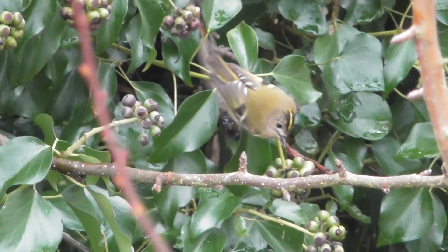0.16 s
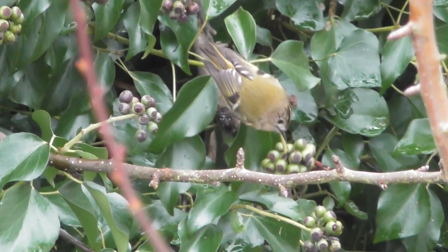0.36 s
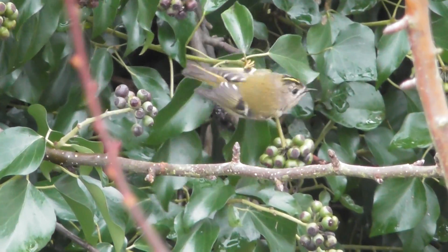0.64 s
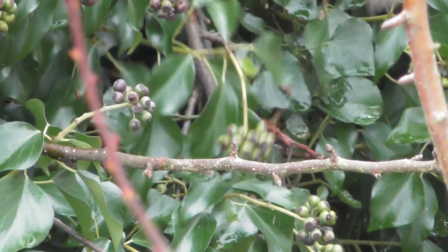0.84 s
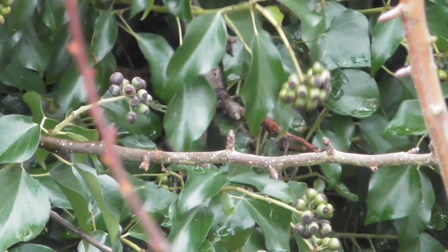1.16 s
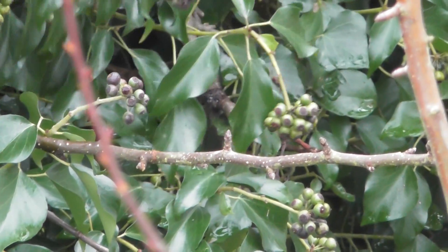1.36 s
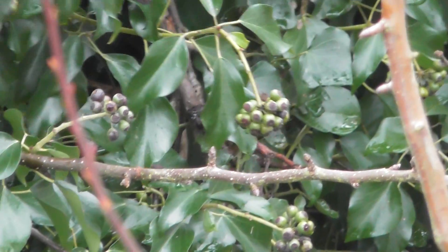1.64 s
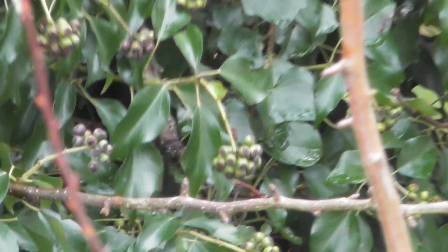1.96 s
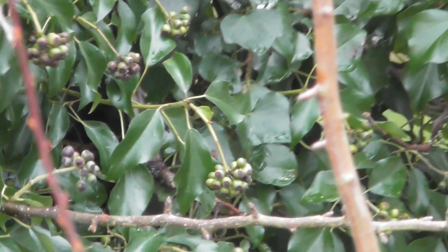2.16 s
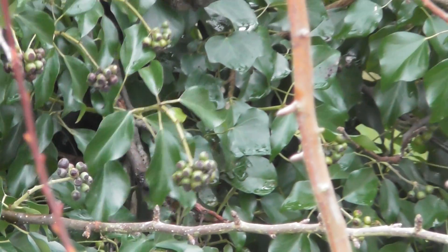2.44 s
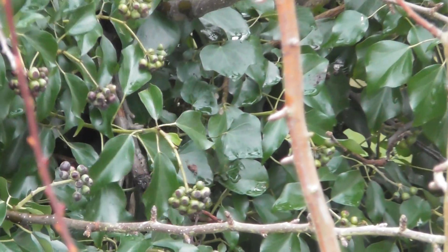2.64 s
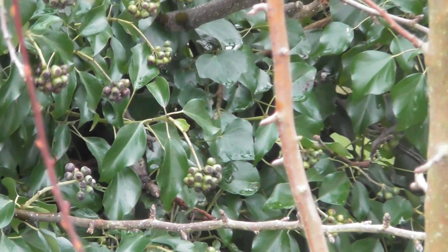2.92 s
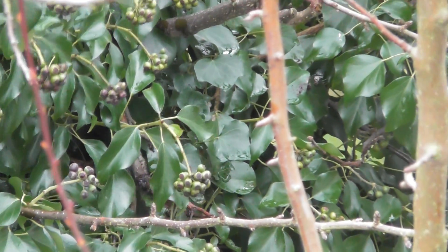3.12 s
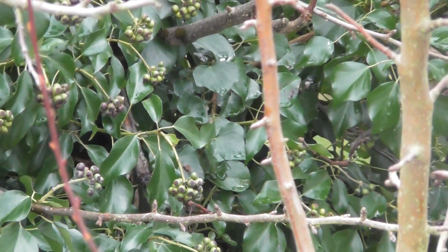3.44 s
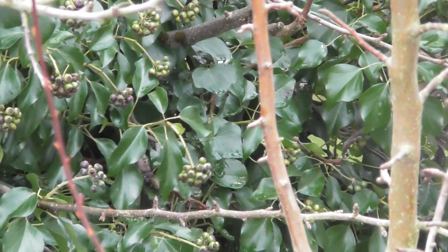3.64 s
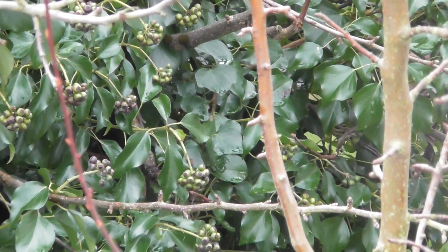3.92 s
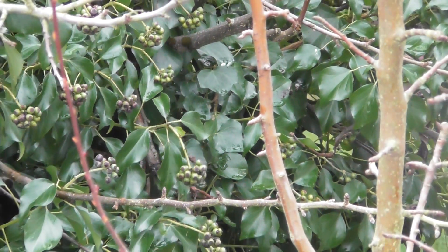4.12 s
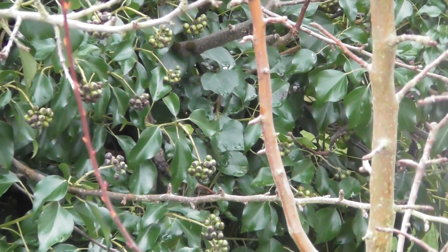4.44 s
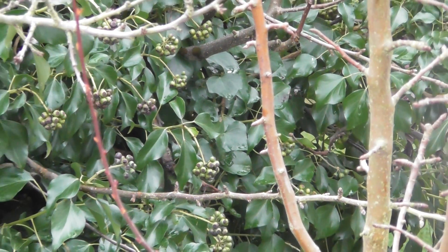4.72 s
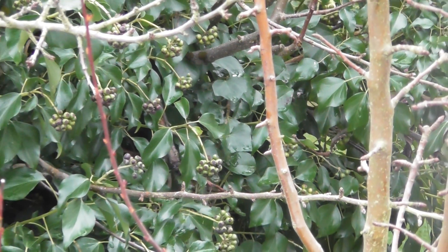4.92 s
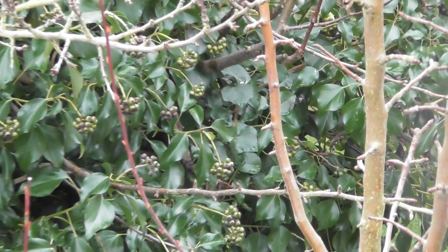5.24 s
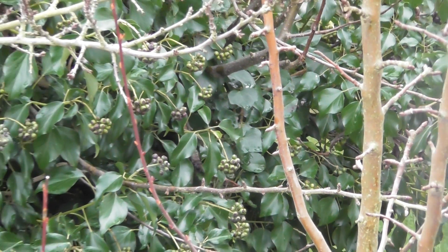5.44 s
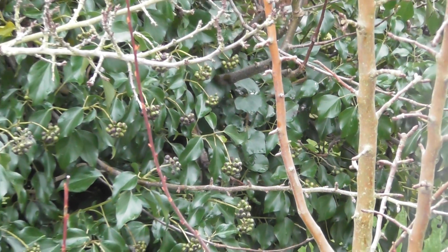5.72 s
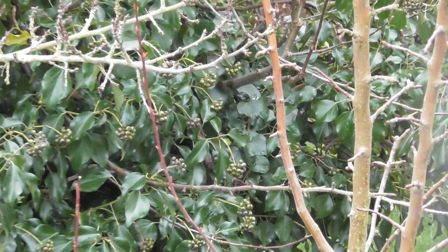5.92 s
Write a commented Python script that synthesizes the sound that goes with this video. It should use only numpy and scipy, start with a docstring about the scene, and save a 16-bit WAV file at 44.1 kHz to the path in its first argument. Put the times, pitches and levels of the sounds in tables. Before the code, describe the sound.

Very high, pure bird calls and one quick wing flick against leaves, with tiny ticks afterwards, above a steady soft traffic rumble in a garden.

```python
"""Thin, falling whistles and short sharp calls: a goldcrest in ivy, each note one pure, trembling tone.
It flicks off its twig with two wing strokes, bursts of noise over a short ring, and ticks and rustles follow.
It keeps calling from deeper in the hedge, whose leaves scatter the sound as dense, fading echoes.
Other birds glide faintly far off. Distant traffic, garden air and breeze on the microphone ports are coloured
noise; the camera hisses, and its lens motor whirs faintly now and then as resonant noise."""
import sys
import numpy as np
from scipy import signal
from scipy.fft import rfft, irfft, next_fast_len
from scipy.io import wavfile
from scipy.ndimage import map_coordinates

SR = 44100
rng = np.random.default_rng(int(sys.argv[2]) if len(sys.argv) > 2 else 0)


def output_pcm(signal):
    """Save a mono or channel-first signal as 16-bit PCM at the path in sys.argv[1].

    Samples are clipped to [-1, 1] before scaling.
    """
    pcm = np.clip(np.atleast_2d(signal).T, -1, 1) * 32767
    wavfile.write(sys.argv[1], SR, np.round(pcm).astype(np.int16))


N = 267775

# In every table a positive left-right level in dB is louder on the left.
# Long falling whistles. Each row: start in seconds, length in seconds, slide in seconds, final pitch in Hz,
# level in dB, soft opening in dB, left-right level in dB, share scattered by the leaves in dB.
WHISTLES = [(0.572, 0.28, .265, 7407, -43, -13, -2, -12), (1.35, .18, .15, 8370, -77, -1, 3, -8),
            (3.362, 0.23, .18, 8090, -65.5, -1.5, 2, -0.5), (5.83, 0.16, .125, 8330, -65, -5, 7, -15)]
# Every whistle starts on the same pitch, slides down ever more slowly and levels off.
WHISTLE_TOP_HZ, SLIDE_BEND = 8894, 1.5
OPENING_S, SWELL_S, WHISTLE_ATTACK_S, WHISTLE_RELEASE_S = 0.058, 0.014, 0.0053, 0.082
# Short arched calls. Each row: start in seconds, length in seconds, top pitch in Hz (before scoop and sag),
# final drop in Hz, lateness of the drop (an exponent), level in dB, attack in seconds, release in seconds,
# left-right level in dB, share scattered by the leaves in dB.
CONTACT_CALLS = [(3.839, 0.14, 8130, 520, 6, -54.5, 0.057, .06, -4.5, -10),
                 (4.488, 0.049, 7856, 420, 1.4, -51.5, 0.0018, 0.0033, 2, -4),
                 (5.8175, .045, 7745, 120, 2.2, -56.5, .002, .004, 0, -3.5)]
SCOOP_HZ, SCOOP_S = 480, 0.005  # each call flicks up towards its top pitch
SAG_HZ_PER_S = 1800  # and sags steadily
# Soft level notes, a little higher at both ends. Each row: start in seconds, length in seconds, pitch in Hz,
# lift at the ends in Hz, level in dB, left-right level in dB.
SOFT_NOTES = [(3.402, .09, 6650, 150, -70.5, 1), (5.347, 0.1, 6610, 280, -72.5, 0),
              (5.975, .07, 8340, 18, -68, 7)]
SOFT_EDGE_S = 0.011
# Tiny rising chips. Each row: start in seconds, starting pitch in Hz, rise in Hz, level in dB.
CHIPS = [(3.672, 6550, 497, -72.5), (3.757, 6400, 1400, -71), (3.854, 6200, 850, -75)]
CHIP_S, CHIP_BEND = 0.028, 0.6
# The two microphone ports hear the highest tones out of step. Each row: Hz, lead of the left in radians.
PORT_LEAD = [(7500, 0.14), (8050, 0.35), (8300, 1.4), (8550, 2.4)]

# Wing strokes against the leaves. Each row: start in seconds, slap in dB, knock in dB, slap's t60 in seconds.
WING_STROKES = [(0.7161, -39.5, -39, 0.03), (0.731, -48, -36, 0.048)]
# Spectrum of the slap. Each row: Hz, dB.
SLAP_SPECTRUM = [(1500, -12), (2600, -25), (3300, -7), (4150, -4), (4900, -8), (6000, -2.5), (9500, 1),
                 (11500, -11), (15500, -13)]
# Ringing tones of the struck twig and leaf. Each row: Hz, dB, t60 in seconds.
TWIG_MODES = [(500, -8, 0.045), (645, 5.5, 0.042), (1187, -8, 0.045), (4180, -6.5, 0.016)]
# The twig springs back, the bird lands, the leaves settle.
# Each row: start in seconds, level in dB, rise in seconds, t60 in seconds.
RUSTLES = [(.728, -54.5, .008, 0.25), (.861, -53.5, 0.0089, 0.18), (.93, -63, .02, .25)]
# Feet and feathers tick on the ivy. Each row: start in seconds, level in dB, t60 in seconds.
TICKS = [(0.8394, -49.5, 0.018), (0.852, -56, 0.013), (0.8695, -58, 0.011), (.884, -60, 0.02),
         (1.656, -58.5, 0.03), (1.847, -62, .02), (3.108, -61, 0.025), (3.838, -60, 0.019),
         (4.4224, -62, .025), (4.8418, -59, 0.014), (5.171, -54.5, 0.012)]
# Spectrum of the ticks and rustles. Each row: Hz, dB.
IVY_SPECTRUM = [(1500, -7), (3200, -2.5), (5000, -3.5), (6300, 6), (8500, 10.5), (11000, -3), (15500, -18)]
# Agreement of the two channels for close sounds. Each row: Hz, left-right likeness from 0 to 1.
NEAR_ALIKE = [(600, 0.75), (6800, 1), (8500, 0.44), (15000, .2)]

# Other birds, far off. Each row: start in seconds, length in seconds, pitch in Hz, glide in Hz, level in dB.
FAR_NOTES = [(1.507, .13, 8340, -50, -79), (1.54, .11, 7400, -280, -79), (3.928, .21, 2730, 139, -87)]

# Lens motor runs. Each row: start in seconds, end in seconds, level in dB.
LENS_RUNS = [(0.427, 0.662, -70.5), (1.885, 2.175, -71), (3.3, 3.405, -71), (5.567, 5.68, -70.5)]
# Resonances of the lens barrel, before the response is squared. Each row: Hz, width in Hz, gain in dB.
LENS_MODES = [(6730, 400, -3), (7420, 300, 1.5), (8080, 280, 3), (9520, 550, 1.5)]

# Spectrum of the traffic's low rumble. Each row: Hz, dB.
RUMBLE_SPECTRUM = [(15, -26.5), (25, -16.5), (38, -14.5), (48, -2), (75, -4), (100, 0.5), (170, 1),
                   (300, 0), (328, 1), (350, -7), (400, -20), (600, -50.5)]
# Spectrum of the tyre wash. Each row: Hz, dB.
WASH_SPECTRUM = [(150, -14), (300, -7), (380, 1.5), (560, 1), (750, -2), (950, -3), (1200, -13),
                 (1330, -23.5), (1420, -47), (1600, -71)]
# Spectrum of the garden air. Each row: Hz, dB.
AIR_SPECTRUM = [(1000, -48), (1430, -11), (1530, 1), (1850, -2), (2200, -10.5), (2580, -15.5), (2900, -7),
                (3500, -9.5), (4300, -9), (5100, -17), (6100, -6), (7500, -1.5), (10000, -12),
                (15000, -21.5)]
# Agreement of the two channels for distant sounds. Each row: Hz, left-right likeness from 0 to 1.
FAR_ALIKE = [(25, .4), (60, 1), (125, 0.97), (500, 0.94), (1000, .98), (4000, 1)]
# Lean of the distant sounds to one side. Each row: Hz, left-right level in dB.
FAR_LEAN = [(25, -12.5), (60, 0), (125, -0.7), (250, 0.5), (500, 3), (1000, 0.65), (2000, 1), (8000, -1)]
# Levels ahead of sway, receding and lean.
RUMBLE_DB, WASH_DB, AIR_DB = -45.5, -52, -73
RECEDE_FROM_S, RECEDE_DB_PER_S = 3.94, 0.66  # traffic and air draw slowly away
# Puffs of breeze. Each row: centre in seconds, peak in dB ahead of the flutter, half-length in seconds.
GUSTS = [(2.33, -62, .05), (2.672, -46, .03), (2.88, -64, 0.13)]
BREEZE_DB = -71  # the calm between puffs, ahead of the flutter
# Spectrum of the breeze on the microphone ports. Each row: Hz, dB.
BUFFET_SPECTRUM = [(8, 2), (22, 7.5), (45, 4), (90, -4), (200, -56.5)]
# Spectrum of the camera's hiss. Each row: Hz, dB.
HISS_SPECTRUM = [(3000, -61), (5300, -45), (6500, -30), (8200, 3.5), (10000, 3.5), (13000, 3.5), (15700, 3)]
# Agreement of the two channels of hiss. Each row: Hz, left-right likeness from 0 to 1.
HISS_ALIKE = [(6800, 0.88), (8200, 0.47), (15000, 0.13)]
TOP_HZ = 15750  # the camera's band limit


def amp(db):
    """Decibels to gain."""
    return 10 ** (np.asarray(db) / 20)


def unit(x):
    """x at rms 1."""
    return x / np.sqrt(np.mean(x ** 2) + 1e-20)


def clock():
    """The time of each sample in seconds."""
    return np.arange(N) / SR


def progress(start, length):
    """0 before the start, rising evenly to 1 over the length."""
    return np.clip((clock() - start) / length, 0, 1)


def along(points, hz):
    """(Hz, value) points read off on a log frequency axis."""
    f, v = np.transpose(points)
    return np.interp(np.log(hz + 1), np.log(f + 1), v)


def gate(start, end, attack, release):
    """1 between start and end, with a smooth rise and fall."""
    rise = (clock() - start) / attack
    fall = (end - clock()) / release
    return np.sin(np.pi / 2 * np.clip(np.minimum(rise, fall), 0, 1)) ** 2


def burst(start, t60, attack):
    """A quick rise and an exponential decay, as of something struck."""
    t = np.maximum(clock() - start, 0)
    return (1 - np.exp(-t / attack)) * amp(-60 * np.minimum(t / t60, 10))


def sides(db):
    """Left and right gains for a level difference."""
    return amp(np.array([[.5], [-.5]]) * db)


def filtered(x, response):
    """x times a response of frequency."""
    m = next_fast_len(N + SR // 4)
    return irfft(rfft(x, m) * response(np.fft.rfftfreq(m, 1 / SR)), m)[..., :N]


def colour(points):
    """The response of a (Hz, dB) spectrum."""
    return lambda hz: amp(along(points, hz))


def body(modes):
    """The summed response of a few resonances, each with a centre, width and gain."""
    return lambda f: sum(amp(db) * 1j * f * w / (c * c - f * f + 1j * f * w) for c, w, db in modes)


def noise(response, alike):
    """Coloured stereo noise of rms 1; alike is one likeness or (Hz, likeness) points."""
    def mid_side_response(hz):
        likeness = along(alike, hz) if np.ndim(alike) else alike + 0 * hz
        turn = np.arccos(np.clip(likeness, -1, 1)) / 2
        return response(hz) * np.array([np.cos(turn), np.sin(turn)])

    mid, side = filtered(rng.standard_normal((2, N)), mid_side_response)
    return unit(np.array([mid + side, mid - side]))


def wobble(rate):
    """A smooth random curve, rate knots a second."""
    knots = rng.standard_normal(int(N * rate / SR) + 4)
    return map_coordinates(knots, [np.arange(N) * rate / SR])


def goldcrest():
    """The bird in the ivy: long falling whistles, short contact calls, soft notes and chips."""
    return whistles() + contact_calls() + soft_notes() + chips()


def whistles():
    """Each whistle opens softly, swells, and slides down until it settles on its final pitch."""
    out = np.zeros((2, N))
    for s, length, slide, final_hz, db, opening_db, pan_db, scatter_db in WHISTLES:
        hz = final_hz + (WHISTLE_TOP_HZ - final_hz) * (1 - progress(s, slide)) ** SLIDE_BEND
        opening = (1 - np.tanh((clock() - s - OPENING_S) / SWELL_S)) / 2
        size = amp(db + opening_db * opening) * gate(s, s + length, WHISTLE_ATTACK_S, WHISTLE_RELEASE_S)
        out += sing(hz, size, pan_db, scatter_db, waver_hz=21.2, flutter_db=0.8)
    return out


def contact_calls():
    """The pitch flicks up towards its top, sags, then drops away towards the end of the call."""
    out = np.zeros((2, N))
    for s, length, top_hz, drop_hz, lateness, db, attack, release, pan_db, scatter_db in CONTACT_CALLS:
        u = progress(s, length)
        age = u * length
        scoop_hz = SCOOP_HZ * np.exp(-age / SCOOP_S)
        hz = top_hz - scoop_hz - SAG_HZ_PER_S * age - drop_hz * u ** lateness
        size = amp(db) * gate(s, s + length, attack, release)
        out += sing(hz, size, pan_db, scatter_db, waver_hz=30, flutter_db=3.0)
    return out


def soft_notes():
    """Quiet level notes whose pitch is curled up at both ends."""
    out = np.zeros((2, N))
    for s, length, hz, lift_hz, db, pan_db in SOFT_NOTES:
        curl = (2 * progress(s, length) - 1) ** 4  # 1 at both ends, 0 in the middle
        size = amp(db) * gate(s, s + length, SOFT_EDGE_S, SOFT_EDGE_S)
        out += sing(hz + lift_hz * curl, size, pan_db, scatter_db=-12, waver_hz=28.2, flutter_db=2.5)
    return out


def chips():
    """Tiny upward flicks of pitch, fastest at the start."""
    out = np.zeros((2, N))
    for s, start_hz, rise_hz, db in CHIPS:
        hz = start_hz + rise_hz * progress(s, CHIP_S) ** CHIP_BEND
        size = amp(db) * gate(s, s + CHIP_S, attack=0.0036, release=.004)
        out += sing(hz, size, pan_db=0, scatter_db=-8, waver_hz=60.5, flutter_db=0.0)
    return out


def sing(hz, size, pan_db, scatter_db, waver_hz, flutter_db):
    """The syrinx sings one pure, slightly trembling tone, and the leaves scatter it."""
    phase = 2 * np.pi * np.cumsum(hz + waver_hz * wobble(260)) / SR
    port_phase = np.array([[.5], [-.5]]) * along(PORT_LEAD, hz)
    envelope = np.sqrt(2) * size * amp(flutter_db * wobble(170))  # the root of 2 makes size an rms
    direct = envelope * np.sin(phase + port_phase)
    return sides(pan_db) * direct + amp(scatter_db) * hedge(direct[0])


def hedge(x, near_t60=0.06, far_t60=0.85, far_db=-8, apart_db=-14):
    """Nearby leaves throw back a dense flurry of echoes; the rest of the hedge adds a short, fading tail."""
    t = np.arange(SR // 8) / SR
    flurry = amp(-60 * t / near_t60)
    tail = amp(far_db - 60 * t / far_t60)
    fade_out = np.cos(np.pi / 2 * t / t[-1])
    decay = (flurry + tail) * fade_out * (t > .002)  # no echo in the first 2 ms
    mid, side = rng.standard_normal((2, len(t))) * decay
    echoes = mid + amp(apart_db) * np.array([side, -side])
    return signal.oaconvolve(x[None], echoes / np.linalg.norm(echoes[0]), axes=1)[:, :N]


def wings():
    """Each stroke slaps the leaves and knocks the twig into a short ring."""
    slap = noise(colour(SLAP_SPECTRUM), NEAR_ALIKE)
    out = np.zeros((2, N))
    for s, slap_db, knock_db, t60 in WING_STROKES:
        ring = np.zeros(N)
        for hz, db, life in TWIG_MODES:
            ring += amp(db) * np.sin(2 * np.pi * hz * (clock() - s)) * burst(s, life, attack=0.0023)
        out += amp(slap_db) * slap * burst(s, t60, attack=0.00059)
        out += amp(knock_db) * ring
    return out


def ivy():
    """The sprung twig rustles in crackly clumps; single ticks follow as the bird hops on."""
    ticks = sum(amp(db) * burst(s, t60, attack=0.00016) for s, db, t60 in TICKS)
    swells = sum(amp(db) * burst(s, t60, rise) for s, db, rise, t60 in RUSTLES)
    crackle = unit(amp(1.9 * wobble(450)))
    return (ticks + swells * crackle) * noise(colour(IVY_SPECTRUM), NEAR_ALIKE)


def far_bird():
    """Faint gliding notes from far off, blurred by their echoes."""
    out = np.zeros((2, N))
    for s, length, start_hz, glide_hz, db in FAR_NOTES:
        hz = start_hz + glide_hz * progress(s, length)
        size = amp(db) * gate(s, s + length, attack=.03, release=.03)
        out += sing(hz, size, pan_db=-5, scatter_db=-1.3, waver_hz=91, flutter_db=3.5)
    return out


def lens():
    """Close to the microphone, the lens motor whirs in the narrow resonances of its barrel."""
    whir = noise(lambda hz: np.abs(body(LENS_MODES)(hz)) ** 2, NEAR_ALIKE)
    runs = sum(amp(db) * gate(start, end, attack=0.0073, release=0.0072) for start, end, db in LENS_RUNS)
    return whir * runs


def traffic_and_air(sway_db=.5):
    """Far engines rumble and sway, tyres wash and the garden air sounds faintly; all draw slowly away."""
    recede_db = RECEDE_DB_PER_S * np.maximum(clock() - RECEDE_FROM_S, 0)
    rumble = amp(RUMBLE_DB - recede_db + sway_db * wobble(6.8)) * noise(colour(RUMBLE_SPECTRUM), FAR_ALIKE)
    wash = amp(WASH_DB - recede_db) * noise(colour(WASH_SPECTRUM), FAR_ALIKE)
    air = amp(AIR_DB - recede_db) * noise(colour(AIR_SPECTRUM), FAR_ALIKE)
    return filtered(rumble + wash + air, lambda hz: sides(along(FAR_LEAN, hz)))


def breeze():
    """Puffs of air buffet the microphone ports with low, fluttering noise, partly opposed left to right."""
    puffs = sum(amp(db) * np.exp(-((clock() - s) / half) ** 2) for s, db, half in GUSTS)
    flutter = amp(2.5 * wobble(4.9))
    return (amp(BREEZE_DB) + puffs) * flutter * noise(colour(BUFFET_SPECTRUM), alike=-0.29)


def hiss():
    """The camera's own steady, high noise."""
    return amp(-67.0) * noise(colour(HISS_SPECTRUM), HISS_ALIKE)


def scene():
    """The bird in its hedge, the far birds, the camera and the garden."""
    bird = goldcrest() + wings() + ivy()
    return bird + far_bird() + lens() + traffic_and_air() + breeze() + hiss()


def record(dry):
    """The camera keeps nothing above its band limit."""
    return filtered(dry, lambda hz: hz < TOP_HZ)


dry = scene()
out = record(dry)
output_pcm(out)
```